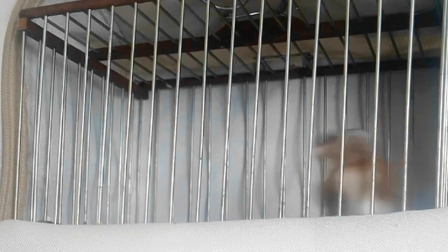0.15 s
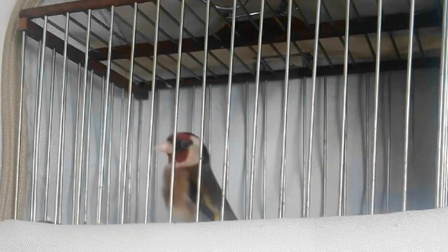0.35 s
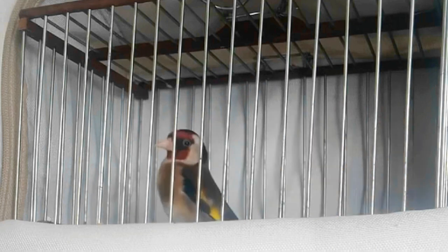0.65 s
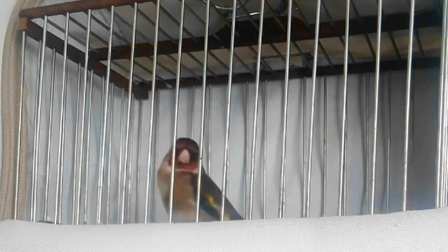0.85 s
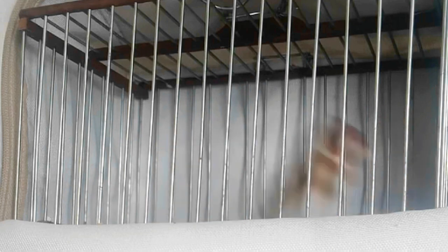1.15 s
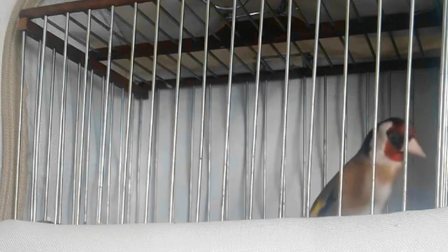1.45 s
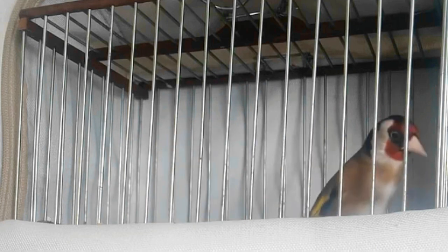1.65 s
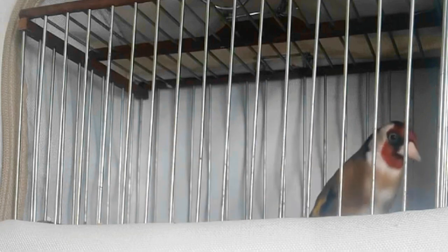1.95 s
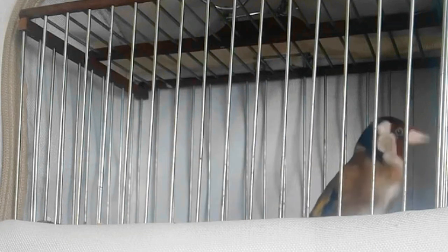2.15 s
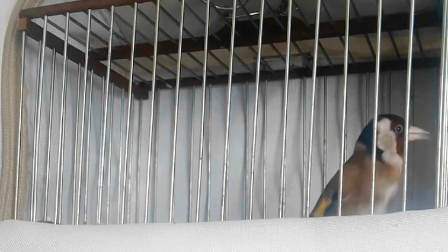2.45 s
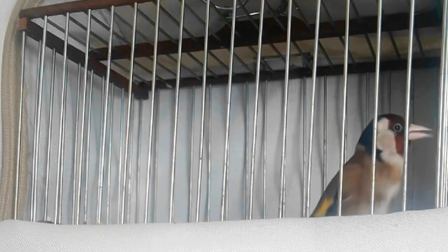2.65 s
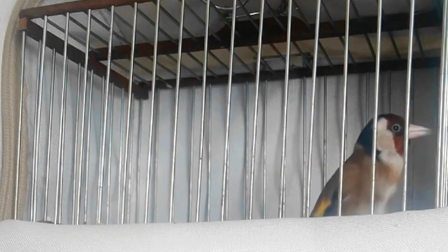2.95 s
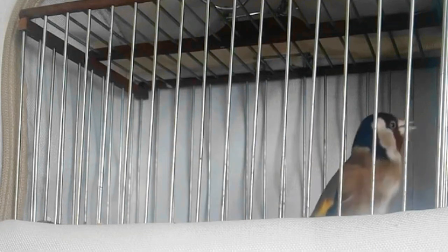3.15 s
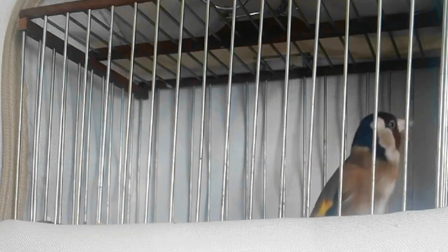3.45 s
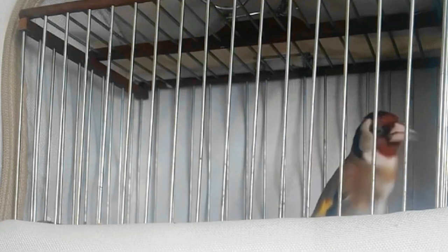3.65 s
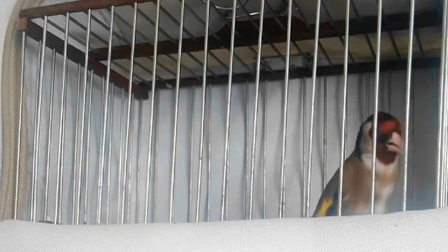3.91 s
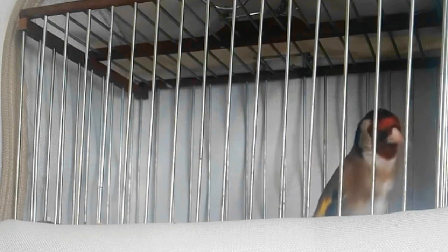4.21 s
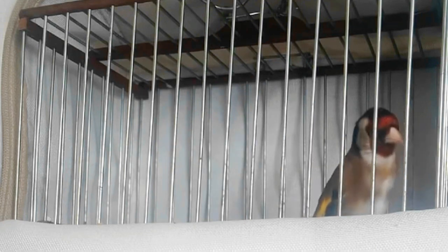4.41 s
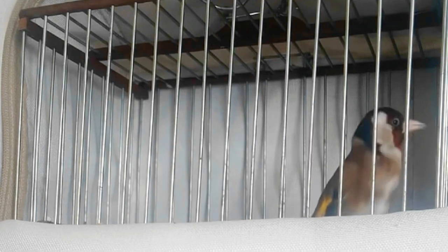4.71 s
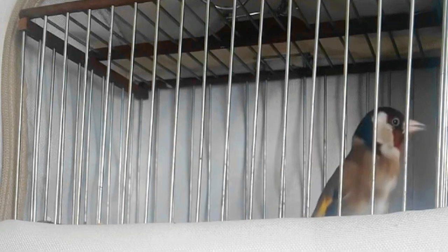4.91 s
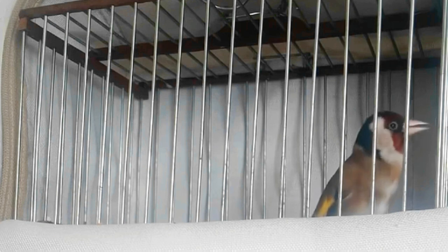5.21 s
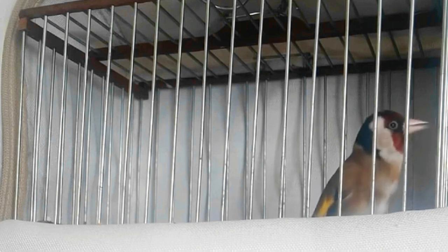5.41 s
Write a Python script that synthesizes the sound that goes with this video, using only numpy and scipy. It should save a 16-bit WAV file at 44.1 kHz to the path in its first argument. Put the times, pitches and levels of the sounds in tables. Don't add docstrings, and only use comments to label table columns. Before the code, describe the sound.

Soft, mostly low room noise, a faint unsteady motor hum and barely audible thin whines run throughout. Dull wooden perch knocks come at 0.1, 0.3 (the strongest) and 0.8 s, with a very faint distant whistle around 0.55-0.75 s. At 1.2 s there is a lighter landing with a quick scatter of claw ticks on wire. The finch begins with two soft rising notes at 1.35 and 1.55 s and a thin peep, then a loud trill from 1.7 to 2.7 s, alternating low upward and higher falling notes about ten times a second. From 2.7 to 3.6 s come five high falls with upward sweeps and hooks; from 3.6 to 4.6 s, repeated sharp blips, held whistles, low pips and scoops. From 4.7 s, curling notes, loud drops and slides alternate with longer low whistles at 5.0 and 5.3 s, ending on a high fall near 5.5 s. Close, bright, slightly clipped, briefly reverberant.

```python
import sys
import numpy as np
from scipy import signal
from scipy.fft import rfft, irfft, next_fast_len
from scipy.io import wavfile
from scipy.ndimage import uniform_filter1d, minimum_filter1d, map_coordinates

SR = 44100
rng = np.random.default_rng(int(sys.argv[2]) if len(sys.argv) > 2 else 0)


def gain_from_decibels(decibels):
    exponent = np.asarray(decibels, float) / 20
    return 10 ** exponent


def persist_wave(psi):
    counts = np.round(np.clip(psi, -1, 1) * 32767).astype(np.int16)
    wavfile.write(sys.argv[1], SR, np.atleast_2d(counts).T)


N = 245637


def along(points, hz):
    f, value = np.transpose(points)
    return np.interp(np.log(hz + 1), np.log(f + 1), value)


def wobble(rate, count=N):
    knots = rng.standard_normal(int(count * rate / SR) + 4)
    return map_coordinates(knots, [np.arange(count) * rate / SR])


def filtered(x, response):
    m = next_fast_len(len(x) + 8192)
    return irfft(rfft(x, m) * response(np.fft.rfftfreq(m, 1 / SR)), m)[:len(x)]


# [f/Hz, level/dB]
AIR_SPECTRUM = [(15, -66), (30, -17.5), (114, -13.5), (206, -.5), (1070, -11.5), (4250, -20.5), (5730, -25),
                (14800, -30.5)]
# [f/Hz, level/dB]
WHINES = [(3591, -75.5), (4043, -84), (4183, -76.5)]
# [t/s, level/dB]
AIR_SWELL = [
    (0, -1),
    (1.3, -1.3),
    (1.8, 4.5),
    (2.4, -2.5),
    (3.4, -1.5),
    (5.57, 1.5),
]


def background():
    t = np.arange(N) / SR
    air = filtered(rng.standard_normal(N), lambda hz: gain_from_decibels(along(AIR_SPECTRUM, hz)))
    air = air / np.std(filtered(air, lambda hz: (hz > 200) & (hz < 900)))
    swell_db = np.interp(t, *np.transpose(AIR_SWELL)) + 1.0 * wobble(21) + 0.83 * wobble(4.24)
    air = air * gain_from_decibels(-54 + swell_db)

    hum_hz, hum_db = 147.4, -57 + 1.2 * wobble(1.7) + 1.6 * wobble(6.1)
    hum = gain_from_decibels(hum_db) * np.sin(2 * np.pi * hum_hz * t + 1.3 * wobble(8))

    whines = np.zeros(N)
    for hz, db in WHINES:
        whine_amp = gain_from_decibels(db + 9.5 + 2.0 * wobble(3.7))
        whines += whine_amp * np.sin(2 * np.pi * hz * t + 0.9 * wobble(26))
    return air + hum + whines


# [t/s, peak level/dB, f/Hz]
LANDINGS = [
    (0.084, -35.5, 369),
    (0.334, -33, 524),
    (0.784, -36.5, 553),
    (1.191, -39, 770),
]
# [t/s, peak level/dB]
CLAW_TICKS = [
    (1.1375, -59.5),
    (1.1444, -50.5),
    (1.1654, -57.5),
    (1.1864, -53),
    (1.1943, -54.5),
    (1.1974, -43),
    (1.2077, -42),
    (1.2244, -40.5),
]


def cage():
    out = np.zeros(N)
    t = np.arange(SR // 10) / SR
    for start, db, hz in LANDINGS:
        thud = filtered(rng.standard_normal(len(t)), lambda f: f / (f + 300) / (1 + (f / 700) ** 2.7))
        knock = 0.4 * np.sin(2 * np.pi * hz * t) + 4.4 * thud
        attack = -np.expm1(-t / 0.001)
        out[round(start * SR):][:len(t)] += gain_from_decibels(db - 60 * t / 0.093) * attack * knock
    for start, db in CLAW_TICKS:
        burst = rng.standard_normal(len(t)) * gain_from_decibels(-60 * t / 0.029)
        tick = filtered(burst, lambda f: f / (f + 900) / (1 + f / 5000))
        out[round(start * SR):][:len(t)] += gain_from_decibels(db + 12.0) * tick
    return out


# [f/Hz, level/dB]
OVERTONE_SHAPE = [(5000, -32), (6500, -35.5), (8000, -38), (9500, -38.5), (11500, -43.5), (13500, -32), (15200, -29)]
# [multiple of the pitch, level/dB]
ORDERS = [
    (2, 4),
    (3, -2),
    (4, -11.5),
    (5, -10.5),
]


def whistle(last_hz, glide, breath, overtone_db, flutter_db):
    length, semitones, haste, turn = glide
    onset_db, rise, let_go, sag_db, end_db = breath
    t = np.arange(SR // 5) / SR
    u = np.clip(t / length, 0, 1)

    haste = max(haste, 1e-2)
    first_hz = last_hz * 2 ** (semitones / 12)
    if semitones < 0:
        knee = 4.96
        done = haste * u / (1 + (haste * u) ** knee) ** (1 / knee)
    else:
        done = -np.expm1(-haste * u)
    hz = first_hz + (last_hz - first_hz) * done / done[-1]
    hz = hz * 2 ** (turn * u ** 3 / 12)
    jitter = 1 + 0.0012 * wobble(131, count=len(t))
    phase = 2 * np.pi * np.cumsum(hz * jitter) / SR

    stages = np.sort(np.clip([0, rise, let_go, 1], 0, 1))
    effort_db = np.interp(u, stages, [onset_db, 0, sag_db, end_db])
    effort_db = effort_db + min(flutter_db, np.sqrt(2)) * wobble(89.4, count=len(t))

    tone = np.sin(phase)
    for k, order_db in ORDERS:
        pressed_db = 0.2 * effort_db + 4.8 * wobble(220, count=len(t))
        level_db = along(OVERTONE_SHAPE, k * hz) + order_db + overtone_db + pressed_db
        tone += gain_from_decibels(level_db) * (k * hz < SR / 2) * np.sin(k * phase)
    tone += gain_from_decibels(-52 + effort_db) * np.diff(rng.standard_normal(len(t) + 1))

    fade = 0.003
    edges = np.clip(np.minimum(t, length + fade - t) / fade, 0, 1)
    return tone * np.sin(np.pi / 2 * edges) ** 2 * uniform_filter1d(gain_from_decibels(effort_db), size=96)


# [t/s, last pitch f/Hz, peak level/dB]
INTRO = [
    (1.341, 3568, -18),
    (1.537, 3527, -21.5),
]
PEEP = [
    (1.677, 6610, -24.5),
]
TRILL_START = [
    (1.716, 4560, -8),
    (1.815, 4494, -6.5),
]
TRILL_DOWN = [(1.924, 4356, -2.4), (2.03, 4360, -2.6), (2.134, 4360, -0.91), (2.233, 4332, -1.9),
              (2.335, 4350, -0.26), (2.439, 4343, 0.43), (2.545, 4265, 0), (2.646, 4312, -0.65)]
TRILL_UP = [(1.786, 3505, -11), (1.897, 3417, -7.5), (2.001, 3405, -7.5), (2.105, 3463, -8.5),
            (2.205, 3503, -11), (2.307, 3518, -9.5), (2.41, 3565, -9), (2.515, 3340, -11),
            (2.617, 3374, -9.5)]
SWEEPS = [(2.802, 3636, -6.5), (2.981, 3620, -8), (3.155, 3660, -6.5), (3.324, 3604, -7), (3.487, 3590, -8),
          (5.086, 3850, -6.5)]
CHIPS = [
    (3.586, 3086, -13),
    (4.686, 3004, -5.5),
]
PIPS = [
    (3.799, 2803, -15),
    (4.014, 2760, -16.5),
    (4.24, 2703, -17),
    (4.466, 2660, -19),
]
CURLS = [
    (4.832, 5750, -15),
    (5.146, 5636, -18),
]
HIGH_FALLS = [
    (2.728, 5846, -5),
    (2.901, 5866, -3.5),
    (3.075, 5877, -4.5),
]
STEEP_FALLS = [
    (3.253, 5910, -1.8),
    (3.423, 5820, -3.3),
]
LAST_FALL = [
    (5.493, 6027, -5),
]
BLIPS = [
    (3.682, 5187, 0.5),
    (3.885, 5204, -4),
    (4.1, 5118, -2),
    (4.33, 5126, -4),
    (4.552, 5026, -3),
]
HOLDS = [(3.697, 4579, -9), (3.901, 4588, -6), (4.116, 4588, -6), (4.349, 4555, -6.5), (4.57, 4578, -6.5)]
SLIDES = [
    (4.871, 4254, -0.84),
    (5.193, 4238, -2.5),
]
LONG_HOOKS = [
    (2.833, 4653, -5.5),
    (3.012, 4630, -6),
]
HOOKS = [
    (3.186, 4690, -1.5),
    (3.353, 4647, -1),
    (3.515, 4724, -1),
]
SCOOPS = [(3.827, 3576, -6.5), (4.044, 3635, -8), (4.27, 3560, -5.5), (4.492, 3542, -6.5)]
STEPS = [
    (3.618, 3873, -6.5),
    (4.75, 3838, -6.5),
    (5.425, 3874, -6.5),
]
LOW_HOLD = [
    (4.979, 2988, -7.5),
]
LONG_HOLD = [
    (5.299, 2942, -5.5),
]
SECOND_VOICE = [
    (5.33, 3180, -22.5),
]
FAR = [
    (0.558, 3080, -59),
    (.66, 4030, -48),
]
ALL_KINDS = [INTRO, PEEP, TRILL_START, TRILL_DOWN, TRILL_UP, SWEEPS, CHIPS, PIPS, CURLS, HIGH_FALLS,
             STEEP_FALLS, LAST_FALL, BLIPS, DROPS := [(4.848, 4613, 0), (5.171, 4620, 1)], HOLDS, SLIDES, LONG_HOOKS, HOOKS,
             SCOOPS, STEPS, LOW_HOLD, LONG_HOLD, SECOND_VOICE, FAR]
# [length/s, first pitch over the last/semitones, haste, turn at the end/semitones]
GLIDES = [(.031, -3.5, 1.22, 0.03), (.034, 0.7, 0.78, 0.2), (.035, 5, 1.5, -0), (0.043, 6, 2.4, 0.5),
          (.027, -4, 1.59, -.7), (.023, -3.5, .8, 0.03), (.02, -2.5, 1.27, -.2), (0.0266, -1.88, 1.7, -0.2),
          (0.023, -0.7, 1.4, -.4), (.05, 3, 3.8, 0.03), (.039, 6.5, 4.6, .1), (0.084, 2, 5, -0.038),
          (0.016, 0.89, 0.62, 0.21), (0.02, 3.5, 1.5, 0.5), (.078, 2.2, 13, 0.06), (0.064, 1.38, 3.8, 0.06),
          (.071, -3.5, 5.6, .02), (.041, -3.5, 3.4, .02), (.038, -3, 1.65, -0.12), (.055, -3.5, 2.9, .02),
          (0.1, -2, 5.2, 0.287), (0.1304, -2.5, 6.5, 0.55), (0.16, 1.8, 4, -0.19), (0.102, 0.2, .9, .05)]
# [onset level/dB, share spent rising, share at which it lets go,
# sag until then/dB, end level/dB]
BREATHS = [(-15, 0.43, 0.79, -4.2, -15.5), (-13, 0.49, 0.59, -10, -13), (-30, 0.48, 0.68, -3.2, -16),
           (-30, 0.28, 0.7, -12.5, -8.5), (-17.5, 0.41, 0.67, 0.8, -15), (-18.5, 0.68, 0.94, -0.7, -9.5),
           (-21, 0.4, 0.96, -1, -26), (-14, 0.48, 0.5, -12, -11), (-11, 0.47, 0.72, -13.5, -11.5),
           (-14, 0.65, 0.95, 1.2, -22.5), (-12.5, 1, 0.98, 3.5, -21.5), (-13.5, 0.45, 0.46, -11.5, -24),
           (-13.5, 0.41, 0.56, -1.5, -3), (-22, 0.56, 0.63, -9, -10.5), (-7, 0.067, 0.81, -6, -9),
           (-6.5, 0.64, 0.48, -2, -6.5), (-29.5, 0.12, 0.38, -14, -5), (-27.5, .23, 0.51, -18.5, -7),
           (-13, 0.12, 0.94, -0.5, -5.5), (-16, 0.35, 0.94, -13.5, -4.5), (-20, 0.11, 0.41, -5.5, -8.5),
           (-27, 0.11, 0.27, -3.5, -14), (-8, 0.33, 0.36, -3.5, -14), (-11, 0.24, 0.4, -9, -28)]
# [overtone level/dB, flutter/dB, share sent to the walls/dB]
VOICES = [(9, -7, -11.5), (0, -2.5, -4.5), (-0.5, -7.1, -11.5), (-3.1, 12.8, -9.5), (1.5, 1.5, -11.5),
          (-0.5, -0.55, -10), (-12.5, -3.4, -13), (2.5, -4.6, -8.5), (16, -4.5, -8), (1.2, .9, -8),
          (-1.7, 2, -9.5), (1, 3.8, -3.5), (3.5, -2.6, -13.5), (-0.5, 7.3, -12.5), (-7.5, 11.5, -4),
          (-17.5, -2.5, -12), (0.1, 20, -9), (-3.2, 2, -7), (-6.5, .26, -14), (0, 1, -9.5), (-4, -0.4, -11),
          (-4, -2.8, -11.5), (1, -9.5, -11), (-12, 3, 1.2)]


def song():
    out = np.zeros((2, N + SR))
    for notes, glide, breath, voice in zip(ALL_KINDS, GLIDES, BREATHS, VOICES):
        overtone_db, flutter_db, walls_db = voice
        for start, last_hz, db in notes:
            note = whistle(last_hz, glide, breath, overtone_db, flutter_db)
            out[:, round(start * SR):][:, :len(note)] += gain_from_decibels([[db], [db + walls_db]]) * note
    return out[:, :N]


# [f/Hz, T60/s]
WALLS = [(500, 0.076), (3300, 0.35), (5000, 0.4), (8000, 0.32), (14000, 0.16)]
# [f/Hz, level/dB]
WALL_COLOUR = [(2500, -1.5), (3500, 1), (4600, .1), (6000, -1), (9000, 6), (14000, 12)]


def room(x):
    hz, t, z = signal.stft(rng.standard_normal(SR * 3 // 4), SR, nperseg=256)
    decay = gain_from_decibels(-60 * t / along(WALLS, hz)[:, None])
    tail = signal.istft(z * decay, SR, nperseg=256)[1]
    tail = tail * -np.expm1(-np.arange(len(tail)) / SR / 0.0043)
    answer = signal.fftconvolve(x, tail / np.linalg.norm(tail))[:N]
    return filtered(answer, lambda f: gain_from_decibels(along(WALL_COLOUR, f)))


def scene():
    backdrop = background()
    feet = cage()
    straight, sent = song()
    return (straight + feet + room(sent + gain_from_decibels(-21.0) * feet) + backdrop)[None]


def limited(x, ceiling):
    needed = np.minimum(1, ceiling / (np.abs(x) + 1e-9))
    gain = uniform_filter1d(minimum_filter1d(needed, size=64), size=40)
    return x * np.pad(gain, (44, 0), "edge")[:N]


def overloaded(x):
    top, lopsided, hardness = 0.48, 0.012, 13.2
    ceiling = top + lopsided * (x < 0)
    return x / (1 + np.abs(x / ceiling) ** hardness) ** (1 / hardness)


def band_limit(x):
    return signal.sosfilt(signal.butter(12, 16230, fs=SR, output="sos"), x)


def record(dry):
    clipped = overloaded(limited(dry[0], ceiling=0.72))
    padded = np.pad(clipped, (0, 512), "reflect")
    band = filtered(padded, lambda hz: hz ** 2 / (hz ** 2 + 30 ** 2) * (hz < 15830))
    return band_limit(band[None, :N])


dry = scene()
out = record(dry)
persist_wave(out)
```